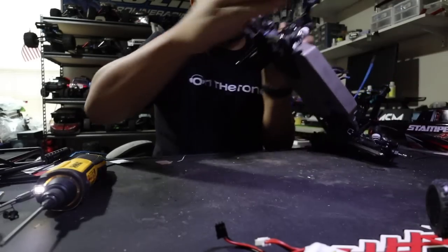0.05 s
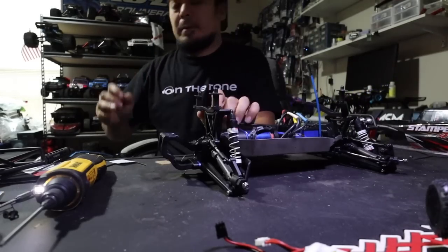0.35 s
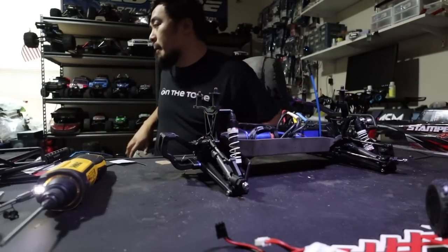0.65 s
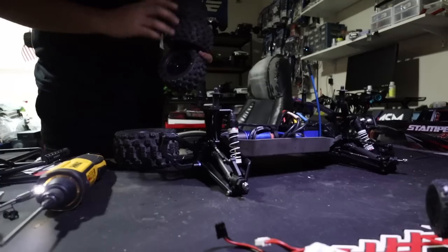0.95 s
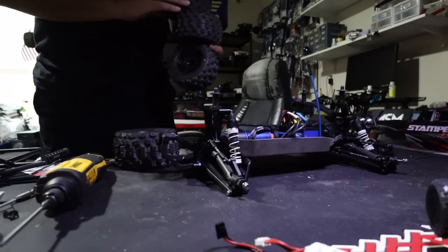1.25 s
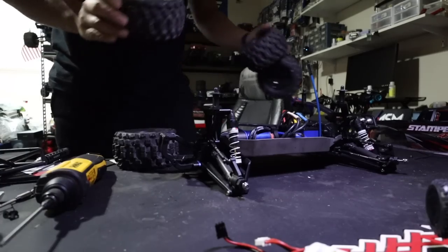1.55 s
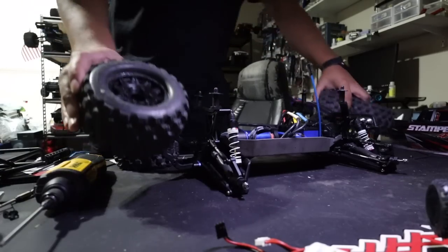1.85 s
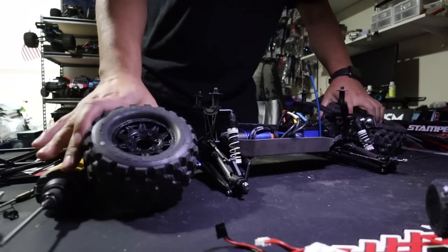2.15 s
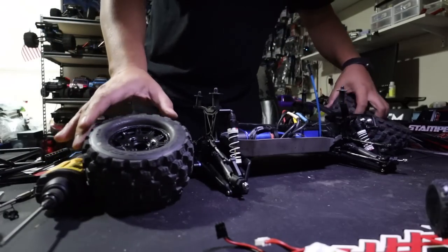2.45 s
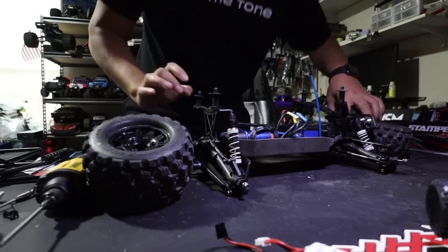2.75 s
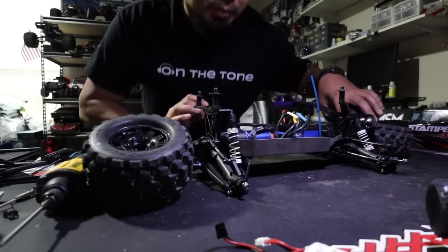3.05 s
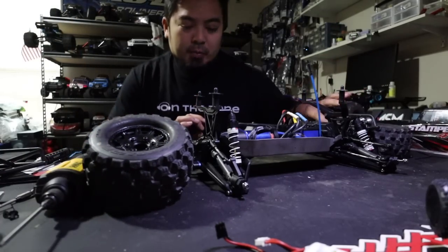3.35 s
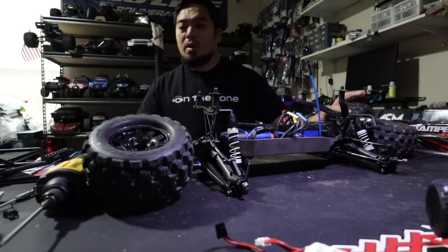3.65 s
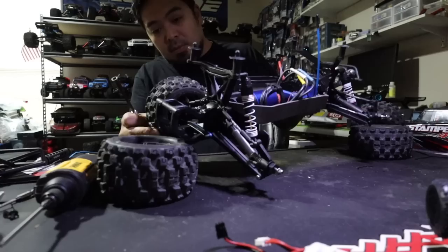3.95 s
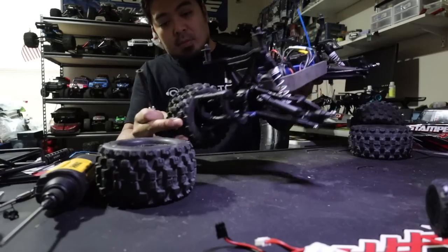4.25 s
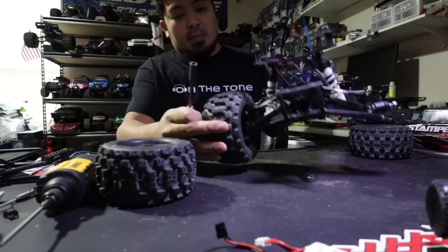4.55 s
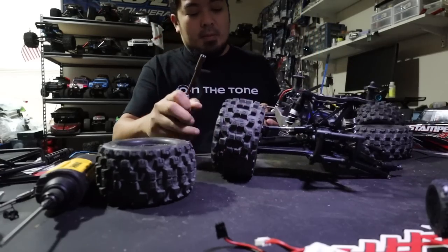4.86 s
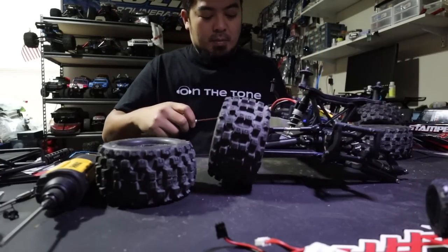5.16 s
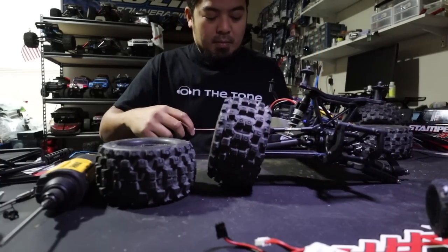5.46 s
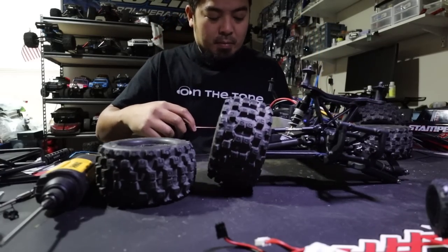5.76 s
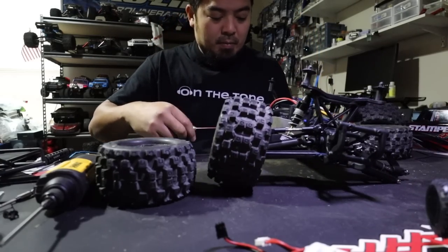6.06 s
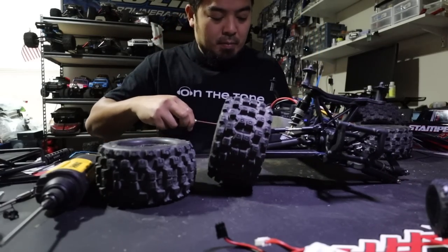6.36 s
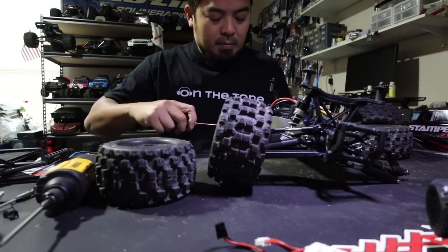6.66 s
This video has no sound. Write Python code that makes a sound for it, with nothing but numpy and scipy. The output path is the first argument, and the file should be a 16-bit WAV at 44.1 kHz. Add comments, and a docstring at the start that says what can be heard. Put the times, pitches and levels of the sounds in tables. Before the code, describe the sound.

Close up in a small workshop, a plastic model truck lands hard on a bench with a knock, a thump and a brief spring twang. Rubber wheels are put down softly amid rustling hands, and someone drops into a padded chair. The chassis clacks and knocks as it is moved, then a steel nut driver ticks and spins with a short squeaky whirr. A fan and mains hum continue faintly underneath.

```python
"""A small workshop, close to the bench: a model truck is set down hard, its rubber wheels laid beside it.
Each landing knocks the plastic chassis, thumps the bench top and bounces; suspension arms clack and a
spring twangs. Someone drops into a padded chair, lifts and lowers the chassis, seats a steel nut driver
with small ticks and spins it with a short, squeaky whirr. Hands and sleeves rustle in between,
over a fan and a mains hum."""
import sys
import numpy as np
from scipy import signal
from scipy.fft import rfft, irfft
from scipy.io import wavfile
from scipy.ndimage import uniform_filter1d

SR = 44100
rng = np.random.default_rng(int(sys.argv[2]) if len(sys.argv) > 2 else 0)


def generate_wav(signal):
    """Clip the signal to [-1, 1] and save it as 16-bit WAV at the path in sys.argv[1]."""
    frames = np.transpose(np.atleast_2d(signal))
    scaled = np.clip(frames, -1, 1) * 32767
    pcm = np.round(scaled).astype(np.int16)
    wavfile.write(sys.argv[1], SR, pcm)


N = 300321
TIME = np.arange(N) / SR
HIT_TIME = TIME[:SR // 3]

# Levels in the tables are relative; each layer has its own trim.
# parts landing on the bench: start_s, knock_db, centre_hz, focus_db_per_octave, thump_db, crack_db,
# bounce_loss_db, punch_db, punch_hz
LANDINGS = [(0.317, -7.5, 403, 8, -12, -20.5, 34, -0.5, 355),
            (0.3229, -0.5, 460, 12, -7.5, -20.5, 23, -8.5, 600),
            (2.0477, -25, 393, 5, -24.5, -28, 25, -25, 790),
            (2.6799, -34.5, 543, 5, -35, -51, 18, -33, 540), (2.707, -37, 732, 4, -38, -72, 12, -29, 900),
            (2.773, -36.5, 514, 15, -29.5, -68, 12, -44, 403),
            (3.849, -36.5, 873, 5, -34.5, -54, 14, -39, 900), (4.17, -21, 655, 32, -13, -35, 8.5, -28, 510),
            (4.233, -41.5, 500, 3, -24.5, -62, 15, -41, 500),
            (4.6395, -27.5, 435, 2, -34, -37, 23, -29, 1980), (4.772, -22, 450, 5, -15, -42, 19, -24, 650),
            (5.2094, -34, 1172, 14, -33, -46, 3.5, -46, 995)]
# plastic touching plastic: start_s, knock_db, centre_hz, crack_db
PLASTIC_CLICKS = [(0.126, -33, 1073, -63), (0.325, -1, 950, -32), (0.334, -4, 620, -45),
                  (0.3415, -13, 644, -48), (0.3468, -31, 686, -27.5), (0.862, -43.5, 1890, -61),
                  (2.0088, -22.5, 1200, -56), (2.282, -36.5, 916, -64.5), (2.657, -37.5, 900, -59),
                  (2.719, -30, 1000, -74), (2.766, -32, 750, -70), (3.795, -34, 933, -55),
                  (4.229, -27.5, 1600, -50), (4.235, -43, 1500, -47), (4.2418, -26.5, 690, -36.5),
                  (4.27, -33, 2400, -51.5), (4.356, -38, 1490, -60), (4.584, -38, 904, -49),
                  (4.646, -25.5, 1500, -36), (4.784, -19.5, 980, -40.5), (4.791, -22, 990, -41),
                  (5.476, -36, 952, -70), (6.23, -50, 1500, -48), (6.5704, -33.5, 2896, -34.5),
                  (6.599, -31.5, 2613, -35.5), (6.609, -41, 2325, -35), (6.618, -29.5, 2200, -48),
                  (6.64, -27.5, 1490, -61), (6.675, -33, 2317, -56), (6.766, -36, 1110, -74.5)]
# a suspension arm hitting its stop: start_s, level_db, centre_hz
ARM_CLACKS = [(0.421, -19.5, 1300), (2.8059, -32, 2300), (2.8205, -41, 1880), (4.042, -41, 2200),
              (4.0499, -33.5, 2445), (4.063, -41, 1200), (4.607, -37, 1200), (4.7438, -19, 2370),
              (4.756, -26, 1300), (5.218, -33, 1590), (5.2269, -27.5, 1600)]
# the spring's twang as the truck settles: start_s, level_db
SPRING_REBOUND = (0.433, -28.5)
# the driver finding the wheel nut: start_s, knock_db, ping_db, ping_hz
DRIVER_TICKS = [(5.605, -44, -53, 4400), (5.629, -32, -42, 7710), (5.778, -37, -44.5, 10300),
                (5.785, -33.5, -56.5, 11000), (5.8855, -45, -48, 5200), (5.8887, -41.5, -54, 9100),
                (6.0217, -38.5, -54, 10500), (6.0249, -31, -55.5, 9000)]
# turns of the driver, one list each: time_s, slip_rate_hz, squeak_db, friction_db
DRIVER_SPINS = [
    [(6.28, 759, -72.5, -63.5), (6.325, 829, -53, -53.5), (6.348, 1012, -49, -47.5),
     (6.365, 1150, -41, -39), (6.385, 1302, -43, -43), (6.412, 1423, -35, -36.5),
     (6.43, 1464, -36.5, -37.5), (6.452, 1413, -39, -38.5), (6.463, 1381, -50, -40),
     (6.475, 1072, -38.5, -39), (6.5, 1072, -52, -46), (6.56, 818, -70, -65)],
    [(6.735, 1400, -76, -64), (6.755, 1343, -55, -51), (6.775, 1410, -60.5, -62)],
]

# ringing modes of the struck parts: pitch_hz, level_db, t60_s
BENCH_MODES = [(66.55, -13.5, 0.13), (98.7, 5, 0.44), (136.3, 6, 0.21), (163.1, 6.5, 0.13),
               (189, 6.5, 0.06)]
CHASSIS_MODES = [(265.7, -3.5, 0.0454), (334, 3.5, 0.07), (397, 6.5, 0.035), (471, 1, 0.04),
                 (544.3, 6.5, 0.081), (594, 2.5, 0.076), (686, -1.5, 0.08), (742, 0, 0.13), (851, 6, 0.03),
                 (974, 3.5, 0.05), (1084, 3, 0.047), (1210, -3.5, 0.039), (1364, -4, 0.024),
                 (1782, -2.5, 0.037), (1881, 0, 0.055), (2214, -1, 0.056), (2370, -3.5, 0.0797),
                 (2680, -2.5, 0.035), (2940, -2.5, 0.02), (3397, -3, 0.042), (3850, -1, 0.032)]
ARM_MODES = [(842, -3.5, 0.084), (1039, 2, 0.034), (1309, -3.5, 0.04), (2190, 4.5, 0.016),
             (2810, -0.5, 0.0146), (3200, -1.5, 0.0148), (3510, -2.5, 0.016), (4940, -12.5, 0.0087),
             (6500, -23.5, 0.0099)]
SPRING_MODES = [(1270, 0, 0.086), (1860, -3, 0.086), (1970, 0.5, 0.16), (2091, -7, 0.063)]
WHEEL_MODES = [(474, -4.5, 0.034), (590, -7, 0.035), (735, -13, 0.023), (910, 4, 0.026), (1018, 3.5, 0.03),
               (1127, 7, 0.035), (1310, -8, 0.0173), (1817, -9, 0.024), (2067, -9, 0.022),
               (2840, -13, 0.012)]
SHAFT_MODES = [(4700, -3, 0.0044), (5540, -6.5, 0.013), (7540, -3, 0.013), (8900, -4, 0.007),
               (9930, -3, 0.008), (10200, -2, 0.0077), (11300, 1, 0.0048)]

# the chair taking the weight: start_s, rise_s, fall_t60_s, level_db
SEAT_SLIDE_AND_SQUASH = [(3.319, 0.075, 0.31, -27), (3.514, 0.004, 0.28, -24)]
SEAT_SLAP = (3.5145, 0.003, 0.11, -26)
CUSHION_PUFF = (3.518, 0.015, 0.26, -40)
# resonances of the chair frame: pitch_hz, width_hz, level_db
FRAME_RESONANCES = [(353, 35, -3), (510, 50, -3), (682, 50, -4.5), (937, 40, -2), (1119, 45, -2.5),
                    (1520, 45, -2), (1960, 45, -3.5), (2230, 70, -6), (2620, 130, -7), (3740, 110, -4)]

# tread and plastic scuffing: start_s, fall_t60_s, level_db, tilt_db_per_octave
SCUFF_STROKES = [(0.005, 0.09, -41, -2.5), (0.14, 0.25, -38, 0), (0.232, 0.43, -35.5, 0),
                 (0.61, 0.23, -44, -1.5), (0.755, 0.48, -50, 1.3), (0.83, 0.12, -47, -1),
                 (1.875, 0.21, -45, -4), (2.092, 0.31, -42.5, -2.5), (2.639, 0.14, -43.5, -1.5),
                 (4.581, 0.85, -47, -0.5), (6.606, 0.18, -41, 4), (6.645, 0.12, -47, 1)]
# reaches of hand and sleeve: middle_s, length_s, rub_db, swish_db
HAND_REACHES = [(0.2, 0.33, -48, -61.5), (0.262, 0.06, -53, -51), (0.673, 0.32, -51.5, -71),
                (1.102, 0.259, -56.5, -73), (1.652, 0.24, -58.5, -59.5), (1.947, 0.082, -63, -65.5),
                (2.194, 0.32, -52.5, -73), (2.839, 0.22, -54.5, -76.5), (3.237, 0.068, -56.5, -63.5),
                (4.027, 0.038, -52.5, -53), (4.045, 0.48, -57, -66.5), (4.63, 0.16, -57, -66),
                (5.099, 0.49, -56.5, -68.5), (6.73, 0.28, -56.5, -69.5)]
# a tyre turned in the hand: middle_s, length_s, level_db
TYRE_TURNS = [(1.683, 0.19, -56), (1.979, 0.109, -51)]
# mains hum: pitch_hz, level_db
HUM_LINES = [(60, -68), (120, -56.5), (240, -70)]

# EQ curves that give each sound its colour: frequency_hz, gain_db
CRACK_EQ = [(300, -14.5), (1000, 3), (3000, 2), (4500, -4.5), (6000, -7), (8000, -12), (10500, -7),
            (13000, -28.5)]
WHIRR_EQ = [(600, -39.5), (1100, -14.5), (1450, -17), (2100, -15.5), (2880, 0), (3500, -3), (4300, -4.5),
            (5100, -9), (5900, -7), (7200, -11.5), (8600, -20), (10300, -11.5), (12000, -33)]
SLIDE_EQ = [(50, -34), (110, -0.5), (260, -3), (350, 0), (450, -9.5), (800, -6.5), (980, -1), (1300, -10),
            (2150, -4.5), (2900, -8), (5000, -17.5), (10000, -28), (12000, -39)]
SQUASH_EQ = [(60, -45), (150, -16), (350, -8.5), (650, -8.5), (860, -13), (1200, -11), (1600, -6.5),
             (2650, -6), (3500, -13.5), (5000, -32), (10000, -23), (12000, -53)]
SLAP_EQ = [(150, -28), (350, -10), (600, 1.5), (1200, 2.5), (1700, -14), (3500, -27), (6000, -32)]
PUFF_EQ = [(2000, -20), (3800, 6.5), (6000, 4.5), (8500, -1), (10800, 2.5), (12000, -34)]
RUB_EQ = [(150, -30.5), (250, 2.5), (606, -4), (1030, -2), (1540, -8), (2270, -7), (4680, -18.5),
          (5590, -21), (10300, -26), (11700, -38), (18000, -100)]
SLEEVE_EQ = [(1500, -30), (3000, -8), (6000, -6), (8500, -11.5), (10500, 0), (11800, -8), (14000, -21.5)]
TYRE_EQ = [(120, -16), (210, -5), (260, 4), (340, 1), (450, -21), (800, -41)]
FAN_EQ = [(12, -46), (20, -10.5), (65, -8), (91, -9.5), (102, -6.5), (123, -9), (148, -12), (233, -17.5),
          (266, -19.5), (576, -25), (694, -25.5), (1120, -27), (1320, -30.5), (1860, -30), (11700, -50),
          (18000, -102)]
REVERB_EQ = [(60, -8), (200, -3.5), (600, -2), (3000, -0.5), (12000, 1.5)]
# decay of the room: frequency_hz, t60_s
REVERB_DECAY = [(100, 0.5), (500, 0.3941), (2000, .5), (5000, 0.45), (12000, 0.2648)]
# stereo width of close and of diffuse sound: frequency_hz, side_minus_mid_db
NEAR_SIDE_EQ = [(60, -32), (170, -27.5), (500, -19), (1000, -12), (2000, -1.5), (4000, 4), (11000, 8.5)]
DIFFUSE_SIDE_EQ = [(60, -27), (130, -15.5), (300, -1), (700, 0), (2000, 3), (5000, 5), (11000, 7.5)]


def landings(touches=3, bounce_s=0.031, softening_db=5):
    """Each landing punches, cracks, rings the chassis and thumps the bench, then bounces on its rubber."""
    hard_hz, hard_db, db_per_octave = 168, -11.5, 18  # softer than hard_db, the thump sinks in pitch
    out = np.zeros(N)
    for start, knock_db, centre_hz, focus_db, thump_db, crack_db, loss_db, punch_db, punch_hz in LANDINGS:
        add(out, start, from_db(punch_db - 3.5) * punch(punch_hz))
        for bounce in range(touches):
            at = start + bounce * bounce_s
            low_db = thump_db - bounce * loss_db
            fade_db = bounce * (loss_db + softening_db)  # knock and crack fade faster than the thump
            thump_hz = hard_hz * 2 ** min((low_db - hard_db) / db_per_octave, 0)
            body = knock(centre_hz, focus_db, grip_s=0.0082, free_share=0.38, low_cut_ratio=0.47)
            snap = cushioned(crack(t60=0.013, tilt_db=-1))
            add(out, at, from_db(knock_db - fade_db - 2) * body)
            add(out, at + 0.0011, from_db(low_db - 2) * thump(thump_hz))  # late, as the rubber gives
            add(out, at, from_db(crack_db - fade_db + 2) * snap)
    return out


def punch(hz, decay_cycles=3.1):
    """The first shove of a contact: a swing or two that die at once."""
    shove = np.sin(2 * np.pi * hz * HIT_TIME) * from_db(-60 * HIT_TIME * hz / decay_cycles)
    return unit_hit(radiate(shove, hz * 0.44))


def knock(centre_hz, focus_db, grip_s, free_share, low_cut_ratio):
    """The spot struck favours some chassis modes; hand or rubber soon damps most of the ring."""
    body = ring(CHASSIS_MODES, -focus_db * octaves_from(CHASSIS_MODES, centre_hz))
    damping = np.exp(-HIT_TIME / grip_s) + free_share
    return unit_hit(radiate(body * damping, centre_hz * low_cut_ratio))


def thump(centre_hz, damping_s=0.027, free_share=0.5, focus_db=15):
    """The bench top is pushed down and swings back, mostly in the modes near centre_hz."""
    hz, db, t60 = np.transpose(BENCH_MODES)[:, :, None]
    envelopes = from_db(db - focus_db * np.abs(np.log2(hz / centre_hz)) - 60 * HIT_TIME / t60)
    boom = (envelopes * np.sin(2 * np.pi * hz * HIT_TIME)).sum(0)
    damping = np.exp(-HIT_TIME / damping_s) + free_share
    return -unit_hit(radiate(boom * damping, centre_hz * 0.51))


def crack(t60, tilt_db):
    """The brief broad snap of two hard surfaces meeting."""
    return unit_hit(noise(CRACK_EQ, len(HIT_TIME), tilt_db) * from_db(-60 * HIT_TIME / t60))


def clicks():
    """Plastic taps plastic: a knock and a bright snap that leave the bench still."""
    out = np.zeros(N)
    for start, knock_db, centre_hz, crack_db in PLASTIC_CLICKS:
        body = knock(centre_hz, focus_db=8, grip_s=0.0055, free_share=0.44, low_cut_ratio=0.55)
        add(out, start, from_db(knock_db - 13) * body)
        add(out, start, from_db(crack_db - 4) * crack(t60=0.028, tilt_db=2.5))
    return out


def clacks(focus_db=6.5):
    """A hard plastic arm hits its stop and rings briefly in the modes that the spot struck favours."""
    out = np.zeros(N)
    for start, db, centre_hz in ARM_CLACKS:
        arm = ring(ARM_MODES, -focus_db * octaves_from(ARM_MODES, centre_hz), scatter_db=0.5)
        snap = from_db(-4.5) * cushioned(crack(t60=0.056, tilt_db=-2.5))
        add(out, start, from_db(db - 6.5) * (arm + snap))
    return out


def spring():
    """The coil twangs once as the suspension comes back up."""
    out = np.zeros(N)
    start, db = SPRING_REBOUND
    add(out, start, from_db(db) * ring(SPRING_MODES))
    return out


def ticks(wheel_rise_s=0.00153, focus_db=22):
    """The socket taps the nut: the hollow wheel rings up; the shaft's ping depends on the spot touched."""
    out = np.zeros(N)
    for start, knock_db, ping_db, ping_hz in DRIVER_TICKS:
        wheel = ring(WHEEL_MODES, scatter_db=3.5) * (1 - np.exp(-HIT_TIME / wheel_rise_s))
        dull_snap = from_db(-13) * crack(t60=0.035, tilt_db=-5)
        add(out, start, from_db(knock_db - 3) * (wheel + dull_snap))
        shaft = ring(SHAFT_MODES, -focus_db * octaves_from(SHAFT_MODES, ping_hz), scatter_db=3)
        bright_snap = from_db(-1) * crack(t60=0.074, tilt_db=-1.5)
        add(out, start, from_db(ping_db - 3) * (shaft + bright_snap))
    return out


def whirr(flutter_db=2.5, jitter_share=0.025):
    """The spinning driver squeaks upward as it gathers speed, then breaks into a rasp as it slows."""
    out = np.zeros(N)
    for turn in DRIVER_SPINS:
        times, *curves = np.transpose(turn)
        rate_hz, squeak_db, friction_db = (np.interp(TIME, times, curve) for curve in curves)
        phase = 2 * np.pi * np.cumsum(rate_hz * (1 + jitter_share * drift(900))) / SR
        harmonics = sum(np.cos(k * phase) * from_db(3 * drift(70)) for k in range(1, 9))
        squeak = from_db(squeak_db - 2) * colour(harmonics, WHIRR_EQ)
        rasp = from_db(friction_db - 6) * noise(WHIRR_EQ)
        out += (squeak + rasp) * (TIME > times[0]) * (TIME < times[-1])
    return out * from_db(flutter_db * drift(120))


def chair(frame_db=7.5):
    """Upholstery slides, then is slapped and squashed; its slips rattle the frame, the cushion puffs."""
    out = np.zeros(N)
    for (start, rise_s, fall_t60, db), eq in zip(SEAT_SLIDE_AND_SQUASH, (SLIDE_EQ, SQUASH_EQ)):
        grains = slips(per_s=6000, spread_db=1.5)
        rustle = rms_one(colour(grains + from_db(frame_db) * chair_frame(grains), eq))
        add(out, start, from_db(db - 3.5) * stroke(rise_s, fall_t60) * rustle)
    for (start, rise_s, fall_t60, db), eq in ((SEAT_SLAP, SLAP_EQ), (CUSHION_PUFF, PUFF_EQ)):
        add(out, start, from_db(db + 1.5) * stroke(rise_s, fall_t60) * noise(eq, size=SR))
    return out


def chair_frame(x):
    """The frame rings in its resonances."""
    return sum(from_db(db) * signal.lfilter(*signal.iirpeak(hz, hz / width_hz, fs=SR), x)
               for hz, width_hz, db in FRAME_RESONANCES)


def scuffs(rise_s=0.018):
    """Tread and plastic drag over each other in short grainy strokes."""
    out = np.zeros(N)
    for start, fall_t60, db, tilt_db in SCUFF_STROKES:
        grains = slips(per_s=4000, spread_db=1)
        scrape = radiate(colour(grains, RUB_EQ, tilt_db), low_cut_hz=480)
        add(out, start, from_db(db - 3.5) * stroke(rise_s, fall_t60) * rms_one(scrape))
    return out


def handling(grain_db=2.5):
    """With each reach, fingers rub grainily over tread and plastic; the sleeve swishes more smoothly."""
    rub_level, swish_level = 0, 0
    for middle_s, length_s, rub_db, swish_db in HAND_REACHES:
        movement = swell(middle_s, length_s)
        rub_level += movement * from_db(rub_db - 4.5)
        swish_level += movement * from_db(swish_db - 5)
    fingers = rub_level * from_db(grain_db * drift(150)) * diffuse(RUB_EQ)
    return fingers + swish_level * diffuse(SLEEVE_EQ)


def tyre_rub(grain_db=-1):
    """A hollow tyre turned in the hand gives a dull, uneven rub."""
    level = sum(from_db(db) * swell(middle_s, length_s) for middle_s, length_s, db in TYRE_TURNS)
    return level * from_db(grain_db * drift(55)) * noise(TYRE_EQ)


def room_tone(fan_db=-54, waver_db=2.5):
    """A bed of fan noise and slightly wavering mains hum."""
    hum = 0
    for hz, db in HUM_LINES:
        level = np.sqrt(2) * from_db(db + waver_db * drift(5.8))
        hum += level * np.sin(2 * np.pi * (hz * TIME + rng.random()))
    return from_db(fan_db) * diffuse(FAN_EQ) + hum


def workshop_reverb(x, build_s=0.0015):
    """Cluttered shelves scatter the sound into a dense tail that dies band by band."""
    age = TIME[:SR]
    edges_hz = np.geomspace(40, 16000, 10)
    white, tail = rng.standard_normal((2, SR)), 0
    for low, high in zip(edges_hz, edges_hz[1:]):
        band_pass = signal.butter(2, [low, high], "band", fs=SR, output="sos")
        band = signal.sosfilt(band_pass, rng.permuted(white, axis=1))
        tail += band * from_db(-60 * age / at_hz(REVERB_DECAY, np.sqrt(low * high)))
    mid, side = colour(tail, REVERB_EQ) / np.sqrt(np.sum(tail[0] ** 2))
    response = stereo(mid, colour(side, DIFFUSE_SIDE_EQ)) * (1 - np.exp(-age / build_s))
    return signal.fftconvolve(x[None], response, axes=1)[:, :N]


def ring(modes, weight_db=0, scatter_db=0):
    """Damped modes, each struck with a strength and sign of its own."""
    hz, db, t60 = np.transpose(modes)
    strengths = from_db(db + weight_db + scatter_db * rng.standard_normal(len(hz)))
    signs = rng.choice([-1, 1], len(hz))
    partials = np.sin(2 * np.pi * np.outer(hz, HIT_TIME)) * from_db(-60 * np.outer(1 / t60, HIT_TIME))
    return unit_hit((strengths * signs) @ partials)


def octaves_from(modes, centre_hz):
    """How far each mode lies from a pitch."""
    return np.abs(np.log2(np.array(modes)[:, 0] / centre_hz))


def radiate(x, low_cut_hz):
    """A vibrating body sends out little below its own resonances."""
    return signal.sosfilt(signal.butter(3, low_cut_hz, "high", fs=SR, output="sos"), x)


def cushioned(x, high_cut_hz=7150):
    """A contact softened by rubber loses its top."""
    return signal.sosfilt(signal.butter(4, high_cut_hz, fs=SR, output="sos"), x)


def slips(per_s, spread_db):
    """One second of stick-slip: random little releases of uneven size."""
    sizes = from_db(spread_db * np.minimum(rng.exponential(1, SR), 3)) * rng.choice([-1, 1], SR)
    return sizes * (rng.random(SR) < per_s / SR)


def stroke(rise_s, fall_t60):
    """Envelope of a rub that builds up and dies away."""
    age = TIME[:SR]
    return np.clip(age / rise_s, 0, 1) * from_db(-60 * np.maximum(age - rise_s, 0) / fall_t60)


def swell(middle_s, length_s):
    """A movement gathers speed and slows again; the length spans its louder part."""
    return np.exp(-2 * ((TIME - middle_s) / length_s) ** 2)


def drift(rate_hz):
    """A smooth random wobble of unit power."""
    knots = rng.standard_normal(N // 20)
    return rms_one(np.interp(TIME * rate_hz, np.arange(len(knots)), knots))


def noise(eq, size=N, tilt_db=0):
    """Coloured noise of unit power."""
    return rms_one(colour(rng.standard_normal(size), eq, tilt_db))


def colour(x, eq, tilt_db=0):
    """Apply an EQ curve, tilted by tilt_db per octave about 1 kHz."""
    hz = np.fft.rfftfreq(x.shape[-1], 1 / SR)
    octaves = np.log2((hz + 1) / 1000)
    return irfft(rfft(x) * from_db(at_hz(eq, hz) + tilt_db * octaves), x.shape[-1])


def at_hz(curve, hz):
    """Read a curve on a log-frequency axis."""
    points_hz, values = np.transpose(curve)
    return np.interp(np.log(np.maximum(hz, 1)), np.log(np.maximum(points_hz, 1)), values)


def near(x):
    """A close source: the side signal is a quarter cycle out of step with the mid."""
    return stereo(x, colour(signal.hilbert(x).imag, NEAR_SIDE_EQ))


def diffuse(eq):
    """Noise arriving from all around."""
    return stereo(noise(eq), colour(noise(eq), DIFFUSE_SIDE_EQ))


def stereo(mid, side):
    """Left and right from mid and side."""
    return np.array([mid + side, mid - side])


def add(track, start_s, sound):
    """Mix a sound in at its cue."""
    start = int(np.clip(round(start_s * SR), 0, N - 1))
    track[start:start + len(sound)] += sound[:N - start]


def unit_hit(x):
    """Scale a hit so that its loudest 6 ms have unit power."""
    return x / np.sqrt(uniform_filter1d(x ** 2, size=256).max() + 1e-20)


def rms_one(x):
    """Scale to unit power."""
    return x / np.sqrt(np.mean(x ** 2) + 1e-20)


def from_db(db):
    """Decibels to gain."""
    return 10 ** (np.asarray(db) / 20)


def scene(pan_db=-1.5):
    """The mix: truck up front, handwork a little to the right, the chair wetter, room tone underneath."""
    truck = landings()
    parts = clicks() + clacks() + spring() + scuffs()
    taps, spin, seat = ticks(), whirr(), chair()
    centre = near(truck + from_db(1.5) * seat)
    handwork = near(parts + taps + tyre_rub() + spin) * from_db([[pan_db], [-pan_db]])
    reverb_send = (from_db(-10.5) * truck + from_db(-9) * parts + from_db(-9.5) * taps
                   + from_db(-6.5) * spin + from_db(-2.5) * seat)
    return centre + handwork + workshop_reverb(reverb_send) + handling() + room_tone()


def record(dry, treble_rolloff_hz=11300, high_cut_hz=14900):
    """The highest treble rolls off, the loudest peaks flatten, and a steep high cut follows."""
    heard = signal.sosfilt(signal.butter(8, treble_rolloff_hz, fs=SR, output="sos"), dry)
    clipped = heard / (1 + heard ** 12) ** (1 / 12)
    return signal.sosfilt(signal.ellip(8, 0.2, 60, high_cut_hz, fs=SR, output="sos"), clipped)


dry = scene()
out = record(dry)
generate_wav(out)
```